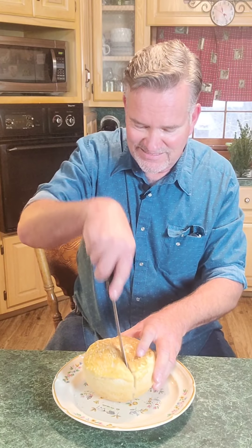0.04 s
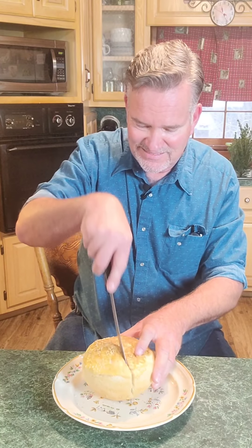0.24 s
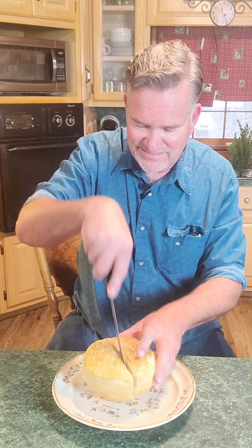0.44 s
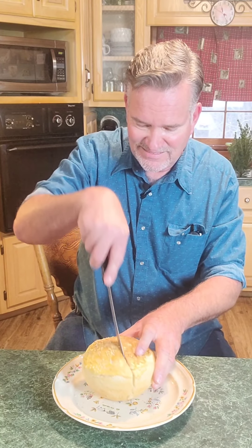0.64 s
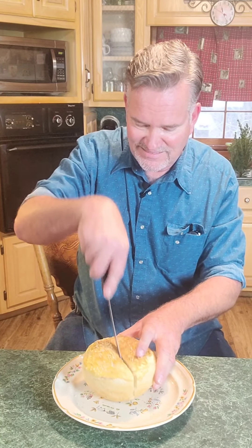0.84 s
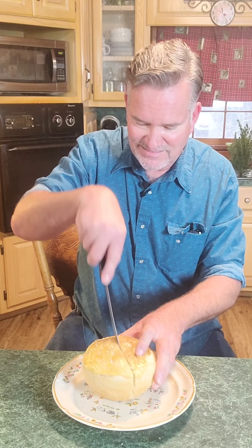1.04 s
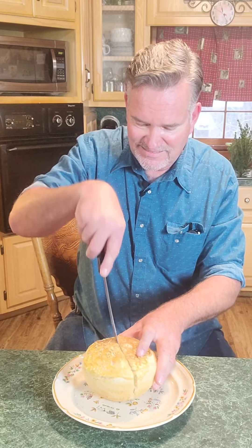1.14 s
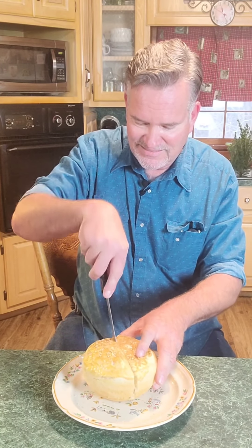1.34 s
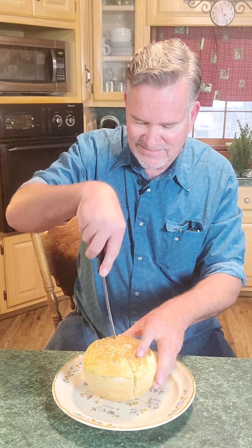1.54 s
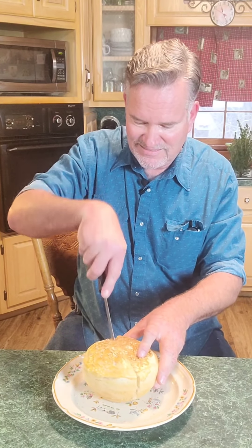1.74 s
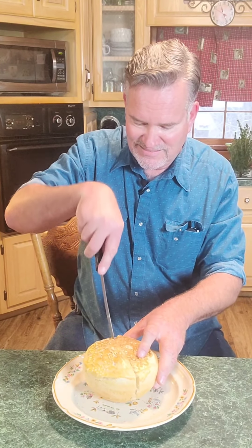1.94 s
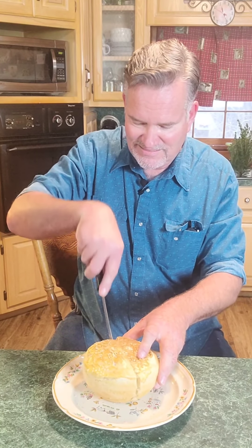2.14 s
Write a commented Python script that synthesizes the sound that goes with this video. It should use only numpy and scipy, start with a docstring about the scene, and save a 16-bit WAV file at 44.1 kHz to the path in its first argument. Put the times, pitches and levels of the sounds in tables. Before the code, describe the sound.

Bread knife sawing crisp crust, crackly short rasps with plate knocks and thuds, quiet kitchen.

```python
"""A quiet kitchen: straight ahead of the microphones a long serrated knife saws to and fro through a
crusty loaf on a china plate. The teeth snap the crust as trains of clicks, coloured into a rasp and a
fine fizz, and excite a hollow note that sinks through each stroke. Larger flakes crack, soft thuds go
into the table, and at times the blade knocks the plate, a sum of dying modes.
The room rings on, its wide reflections mostly treble, over a faint room tone and hiss."""
import sys
import numpy as np
from scipy import signal
from scipy.fft import rfft, irfft
from scipy.io import wavfile
from scipy.ndimage import uniform_filter1d

SR = 44100
rng = np.random.default_rng(int(sys.argv[2]) if len(sys.argv) > 2 else 0)


def unload_audio(sound):
    """Save the sound as a 16-bit wav file, at the path given as the first command line argument."""
    columns = np.transpose(np.atleast_2d(sound))
    # keep every value between -1 and 1, then stretch to whole-number steps
    steps = np.round(np.clip(columns, -1, 1) * 32767)
    wavfile.write(sys.argv[1], SR, steps.astype(np.int16))


N = 97020

# relative spectrum of the tooth rasp: (frequency [Hz], level [dB])
RASP_SPECTRUM = [(30, -54.5), (60, -30.5), (130, -7.5), (300, 4.5), (700, 0), (1150, 0), (1600, -2.5),
                 (2100, -3.5), (2700, -22), (4000, -30.5), (8000, -19), (16000, -68)]
# relative spectrum of the fine crumb fizz: (frequency [Hz], level [dB])
FIZZ_SPECTRUM = [(1500, -41.5), (3500, -8), (4900, 5), (5400, -1), (6400, 5), (7400, 4), (8400, 1),
                 (9300, -4.5), (11000, -12), (13800, -8), (15700, -15.5)]


def amp(db):
    """Decibels to gain."""
    return 10 ** (np.asarray(db) / 20)


def unit(x):
    """Scales to rms 1."""
    return x / np.sqrt(np.mean(x ** 2) + 1e-20)


def read(points, hz):
    """Reads a curve of (frequency, value) points on a log-frequency axis."""
    f, value = np.transpose(points)
    return np.interp(np.log(hz + 1), np.log(f + 1), value)


def add(mix, s, sound):
    """Mixes a sound in at time s [s], trimming whatever falls outside the mix."""
    at = round(s * SR)
    sound = sound[max(-at, 0):]
    part = mix[max(at, 0):][:len(sound)]
    part += sound[:len(part)]


def colour(x, points, size=4096):
    """Minimum-phase filter with the given spectrum, keeping the power of white noise."""
    hz = abs(np.fft.fftfreq(size, 1 / SR))
    log_gain = np.log(amp(read(points, hz)))
    response = np.exp(np.conj(signal.hilbert(log_gain)))
    taps = np.fft.ifft(response).real[:size // 2]
    return signal.fftconvolve(x, taps / np.linalg.norm(taps))[:len(x)]


def resonate(x, hz, width_hz):
    """A steep resonance that follows the pitch hz, fed without the bass below 220 Hz."""
    turn = np.exp(2j * np.pi * np.cumsum(hz * np.ones(len(x))) / SR)
    r = np.exp(-np.pi * width_hz / SR)
    x = signal.sosfilt(signal.butter(2, 220, "high", fs=SR, output="sos"), x)
    # shift the pitch down to 0 Hz, low-pass with a double pole, shift back up
    slow = signal.lfilter([(1 - r) ** 2], [1, -2 * r, r * r], x / turn)
    return 2 * (turn * slow).real


def steady(x, size=800):
    """Holds the running level near 1 and keeps the fine grain."""
    power = abs(uniform_filter1d(x ** 2, size))
    return x / np.sqrt(power + np.mean(x ** 2) / 20 + 1e-20)


def fractures(count, per_s, spread_db):
    """A random train of clicks of uneven size and either sign, as brittle crust breaks."""
    chance = rng.random(count)
    size = np.minimum(rng.standard_normal(count), 2)
    sign = rng.choice([-1., 1.], count)
    return (chance < per_s / SR) * sign * amp(spread_db * size)


def burst(count, decay_s, order=4):
    """A dying crackle with a nearly even spectrum and unit energy."""
    shape = np.exp(-np.arange(count) / SR / decay_s)
    limit = 3 * shape / np.linalg.norm(shape)
    x = rng.standard_normal(count) * shape
    for _ in range(order):
        x = irfft(np.exp(1j * np.angle(rfft(x))), count)  # flatten the spectrum
        x = np.clip(x, -limit, limit)  # keep the decay
    return x / np.linalg.norm(x)


def room_tone():
    """The quiet kitchen's steady hush: coloured noise, equal in both ears."""
    # relative spectrum: (frequency [Hz], level [dB])
    hush_spectrum = [(25, -23), (60, 3), (150, 5), (450, 6), (900, -17.5), (1800, -20), (3000, -17),
                     (4400, -13), (5200, -4.5), (6200, -16.5), (9000, -19), (15500, -20)]
    hush_db = -69.5
    return amp(hush_db) * colour(rng.standard_normal(N), hush_spectrum)


def side_hiss():
    """Coloured noise added to one ear and taken from the other, so the hiss sounds wide."""
    # relative spectrum: (frequency [Hz], level [dB])
    hiss_spectrum = [(30, 1), (300, -5), (1000, -6.5), (3000, -3.5), (5500, 5), (8000, -1), (15000, -5)]
    hiss_db = -77
    return amp(hiss_db) * colour(rng.standard_normal(N), hiss_spectrum)


def sawing(size=260):
    """Teeth break the crust in clumps under an arch of blade speed; the hollow note sinks."""
    # strokes, levels and note as at the fastest point: (start [s], fastest [s], end [s],
    # rasp level [dB], hollow note level [dB], fizz level [dB], hollow note [Hz])
    strokes = [(-.04, 0.07, 0.072, -59, -59.5, -68.5, 670), (0.188, 0.231, 0.29, -35, -44, -49, 604),
               (0.356, 0.42, 0.48, -38.5, -47.5, -54, 505), (0.57, 0.633, 0.68, -38.5, -45.5, -51, 493),
               (0.761, 0.844, 0.86, -46.5, -41, -56.5, 624), (.966, 1.01, 1.055, -40, -37.5, -48, 557),
               (1.171, 1.221, 1.26, -59.5, -48.5, -70.5, 568), (1.343, 1.396, 1.458, -51, -44, -61, 552),
               (1.56, 1.645, 1.69, -69.5, -63, -79, 560), (1.762, 1.818, 2.034, -50, -45, -57, 540),
               (2.151, 2.194, 2.5, -56.5, -50, -63.5, 604.5)]
    arch_power, fizz_power = 1.61, 0.8  # exponents: of the arch, and of the fizz on that arch
    note_sag, note_width_hz = 0.32, 272  # fall of the note over a whole stroke [log frequency]
    teeth_per_s, tooth_spread_db = 1200, 4.5
    crumbs_per_s, crumb_spread_db = 7000, 5.5
    clump_db = 2.5  # rms swing of the slow unevenness
    out, t = np.zeros(N), np.arange(SR // 4) / SR
    for start, fastest, end, rasp_db, note_db, fizz_db, note_hz in strokes:
        phase = np.interp(start + t, [start, fastest, end], [0, .5, 1])
        speed = abs(np.sin(np.pi * phase)) ** arch_power
        drift = uniform_filter1d(rng.standard_normal(len(t)), size)
        clumps = amp(clump_db * unit(drift))
        teeth = unit(fractures(len(t), teeth_per_s, tooth_spread_db))
        crumbs = unit(fractures(len(t), crumbs_per_s, crumb_spread_db))
        rasp = steady(clumps * colour(teeth + 1.08 * crumbs, RASP_SPECTRUM))
        sinking_hz = note_hz * np.exp(note_sag * (.5 - phase))
        note = steady(resonate(teeth, sinking_hz, note_width_hz))
        fizz = steady(clumps * colour(crumbs + 0.64 * teeth, FIZZ_SPECTRUM))
        add(out, start, speed * (amp(rasp_db) * rasp + amp(note_db) * note))
        add(out, start, speed ** fizz_power * amp(fizz_db) * fizz)
    return out


def snaps(size=220):
    """Larger flakes of crust give way, each a crackle dying in a few milliseconds."""
    # single snaps, levels as rms over `size` samples:
    # (time [s], rasp level [dB], hollow note level [dB], fizz level [dB])
    flakes = [(.020, -54.5, -74, -66), (.056, -46, -46.5, -59), (.081, -47, -44.5, -90),
              (.195, -54, -69, -75), (.397, -50, -40.5, -54.5), (.449, -38, -37.5, -63),
              (.489, -46, -42.5, -60), (.615, -39, -33, -60), (.624, -36.5, -29.5, -56),
              (.658, -42, -42, -61), (.813, -46.5, -36.5, -53), (.840, -42, -47, -48.5),
              (.973, -46.5, -62, -74), (.985, -36, -40, -52), (1.007, -38, -34, -62),
              (1.018, -34, -39.5, -54), (1.033, -47, -33.5, -53), (1.219, -49.5, -46, -71),
              (1.364, -50, -45.5, -81), (1.793, -64, -41, -65.5), (2.179, -58, -48, -63)]
    decay_s, note_hz = .0035, 495.5
    out = np.zeros(N)
    for s, rasp_db, note_db, fizz_db in flakes:
        crack = burst(SR // 20, decay_s)
        parts = [(rasp_db, colour(crack, RASP_SPECTRUM)),
                 (note_db, resonate(crack, note_hz, width_hz=273)),
                 (fizz_db, colour(crack, FIZZ_SPECTRUM))]
        for db, part in parts:
            add(out, s, amp(db) * part * np.sqrt(size) / np.linalg.norm(part))
    return out


def thuds():
    """Loaf and plate thud into the table: low-coloured bursts with a softened start."""
    # thuds, level at the loudest 900 samples: (time [s], level [dB])
    blows = [(.22, -66), (0.241, -47), (0.279, -37), (0.429, -62), (0.471, -67), (0.657, -52), (0.833, -68),
             (1.023, -45.5), (1.062, -51), (1.425, -50.5), (1.456, -59), (1.796, -53), (1.839, -34.5),
             (1.868, -43)]
    # relative spectrum: (frequency [Hz], level [dB])
    thud_spectrum = [(25, -37), (50, -19), (80, -3), (140, 3.5), (190, -5), (320, -10.5), (500, -25),
                     (1200, -33.5), (5000, -85.5)]
    rise_s, decay_s = 0.006, .026
    out, t = np.zeros(N), np.arange(SR // 4) / SR
    for s, db in blows:
        push = burst(len(t), decay_s) * (1 - np.exp(-t / rise_s))
        push = colour(push, thud_spectrum)
        loudest = np.sqrt(np.max(uniform_filter1d(push ** 2, size=900)))
        add(out, s, amp(db) * push / loudest)
    return out


def knocks():
    """The blade meets the plate, whose ring the loaf damps; the spot sets the level of each mode."""
    # blade knocks: (time [s], ring level [dB], scratchy contact level [dB], spot on the plate)
    hits = [(0.2746, 0.5, -4, "near"), (1.0437, -8.5, -26, "middle"), (1.0588, 3.5, -10.5, "middle"),
            (1.439, -17, -31.5, "middle"), (1.843, 0, 2.5, "far"), (1.8646, -17, -5, "far")]
    # modes of plate and blade, levels relative to the knock's ring level:
    # (frequency [Hz], t60 [s], near level [dB], middle level [dB], far level [dB])
    modes = [(690, 0.051, -29, -41.5, -30.5), (992.4, 0.022, -17.5, -25.5, -8.5),
             (1210, 0.038, -22.5, -34, -36), (1274, 0.016, -28, -31, -31), (1676, 0.011, -32, -30, -31),
             (1996, 0.018, -9.5, -35.5, -69), (2369, 0.022, -62.5, -38, -17.5),
             (2895, 0.015, -28, -75, -61), (3210, 0.011, -14.5, -41, -69), (3787, 0.054, -65.5, -42, -32),
             (3985, .03, -49, -40.5, -28), (4838, 0.059, -56, -56, -26), (4570, .07, -41, -54, -39),
             (4925, .13, -40, -56, -37), (9080, .07, -58, -72, -58), (10905, .08, -72, -78, -53),
             (5880, 0.053, -36.5, -49.5, -43), (6020, 0.063, -38.5, -48, -55), (7370, .02, -31.5, -43, -43),
             (7780, .022, -59, -67, -24.5), (9460, .02, -38.5, -54, -69), (10160, 0.033, -65, -70, -35.5),
             (12300, .04, -63, -81, -53)]
    # relative spectrum of the scratchy contact: (frequency [Hz], level [dB])
    contact_spectrum = [(60, -16.5), (300, 2), (560, -1.5), (1000, 3), (1600, 0.5), (1950, -11), (2450, -7),
                        (3000, -11.5), (3700, -7.5), (4800, -13), (5400, -19.5), (8000, -23), (9300, -29),
                        (12000, -31.5), (16000, -62)]
    contact_decay_s, rise_s = .003, .001
    out, t = np.zeros(N), np.arange(SR // 3) / SR
    for s, db, contact_db, spot in hits:
        column = ["near", "middle", "far"].index(spot)
        ring = np.zeros(len(t))
        for k, (hz, t60, *levels_db) in enumerate(modes):
            decay = np.exp(-np.log(1000) * t / t60)
            ring += (-1) ** k * amp(levels_db[column]) * decay * np.sin(2 * np.pi * hz * t)
        add(out, s, amp(db) * ring * (1 - np.exp(-t / rise_s)))
        contact = colour(burst(len(t), contact_decay_s), contact_spectrum)
        add(out, s, amp(contact_db) * contact)
    return out


def kitchen(x, size=256):
    """Dense reflections after a short gap, each band dying at its own speed."""
    # reverberation time of the room: (frequency [Hz], t60 [s])
    room_t60 = [(80, 0.25), (250, 0.27), (550, 0.52), (1000, 0.47), (1800, 0.43), (4800, 0.43),
                (8000, 0.31), (15000, 0.079)]
    # spectrum of the reflections: (frequency [Hz], level [dB])
    room_spectrum = [(80, -3), (300, 9.5), (550, -4), (1000, 1), (2000, 0), (4800, 1.5), (8000, -5),
                     (15000, 5.5)]
    gap_s = 0.0031  # the reflections fade in from half to one and a half times this
    taps = steady(fractures(SR, per_s=4000, spread_db=-1))
    hz, t, z = signal.stft(taps, SR, nperseg=size)
    decay = np.exp(-np.log(1000) * t / read(room_t60, hz)[:, None])
    tail = signal.istft(z * decay, SR, nperseg=size)[1]
    gap = np.clip(np.arange(len(tail)) / SR / gap_s - .5, 0, 1)
    z = rfft(tail * gap)
    z /= np.sqrt(uniform_filter1d(abs(z) ** 2, size=90))  # no single room mode booms
    room_gain = amp(read(room_spectrum, np.fft.rfftfreq(len(tail), 1 / SR)))
    tail = gap * irfft(z * room_gain)
    return signal.fftconvolve(x, tail[:SR * 3 // 4])[:N]


def wide_reflections(x):
    """Reflections that differ between the ears, wide only in the treble."""
    # relative spectrum: (frequency [Hz], level [dB])
    wide_spectrum = [(50, -59.5), (2000, -57), (4000, -27.5), (6000, -11), (9000, 6.5), (15000, 13.5)]
    wide_db = -14
    return amp(wide_db) * colour(kitchen(x), wide_spectrum)


def scene():
    """Knife, loaf and plate straight ahead, in a quiet kitchen, as left and right."""
    saw_room_db, knock_room_db = -9, -4  # sends into the room
    hush, hiss = room_tone(), side_hiss()
    saw = sawing() + snaps() + thuds()
    plate = knocks()
    saw_send = amp(saw_room_db) * saw
    plate_send = amp(knock_room_db) * plate
    room = kitchen(saw_send) + kitchen(plate_send)
    mid = saw + plate + room + hush
    side = wide_reflections(saw_send + plate_send) + hiss
    return np.array([mid + side, mid - side])


def record(dry):
    """The recorder's band limit: a steep linear-phase low-pass."""
    edge_hz = 15650
    taps = signal.firwin(511, edge_hz, window=("kaiser", 9), fs=SR)
    return signal.oaconvolve(dry, taps[None], "same", axes=1)


dry = scene()
out = record(dry)
unload_audio(out)
```